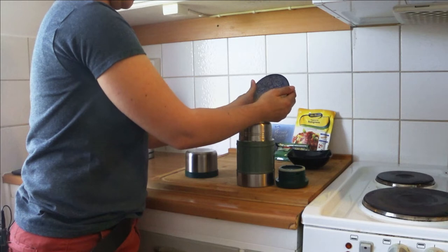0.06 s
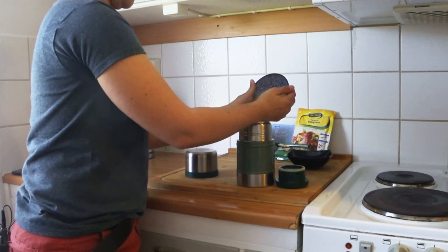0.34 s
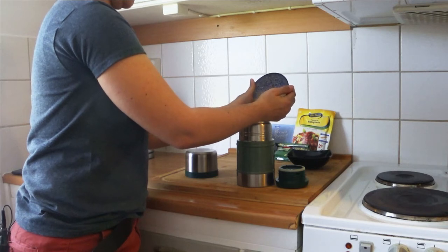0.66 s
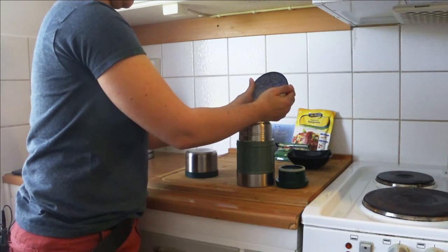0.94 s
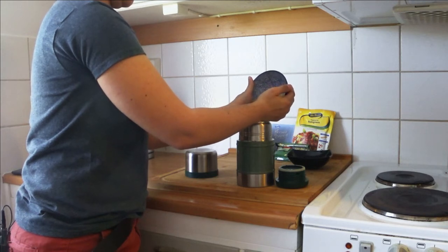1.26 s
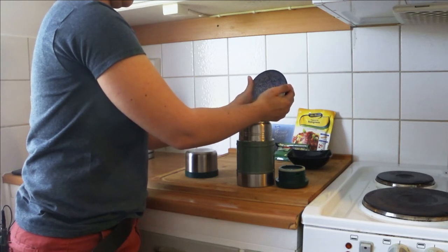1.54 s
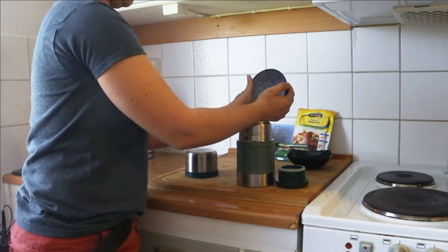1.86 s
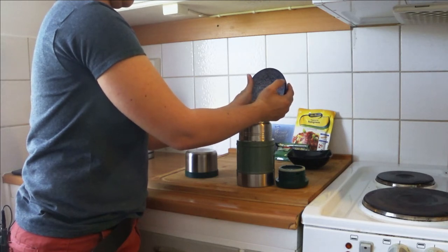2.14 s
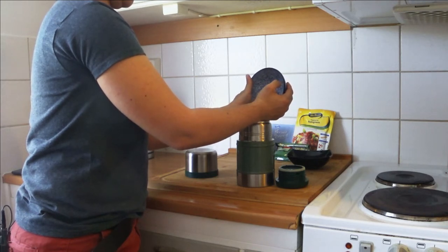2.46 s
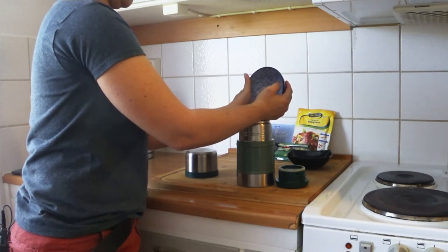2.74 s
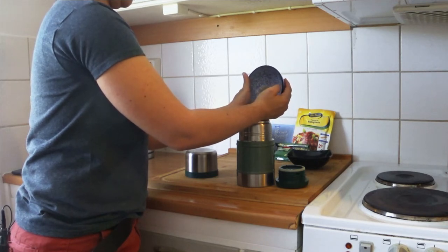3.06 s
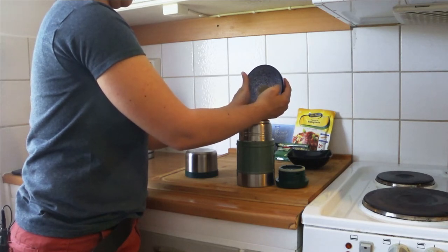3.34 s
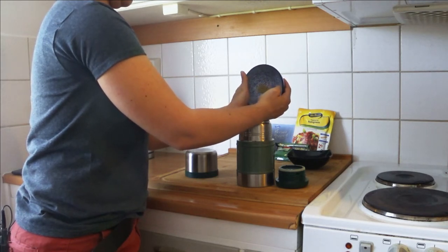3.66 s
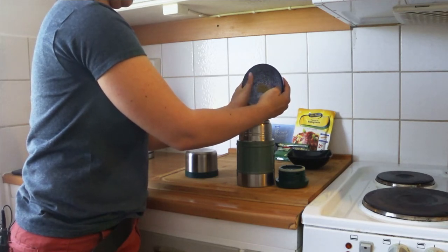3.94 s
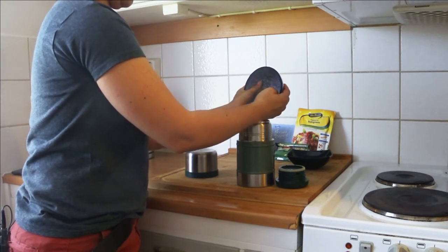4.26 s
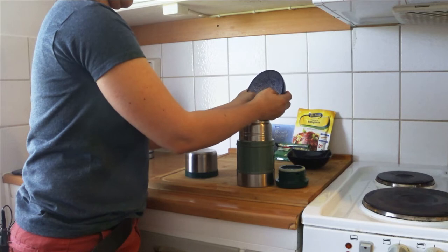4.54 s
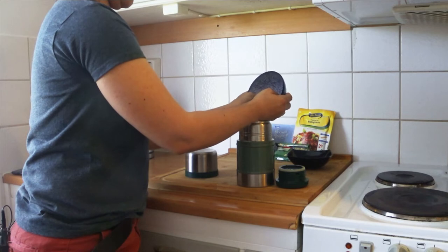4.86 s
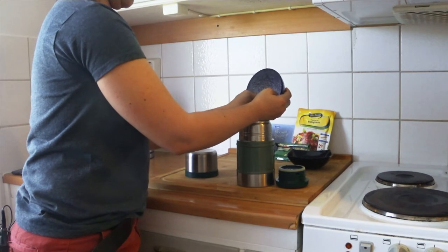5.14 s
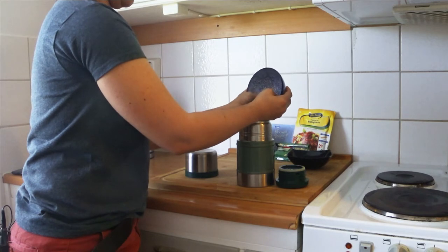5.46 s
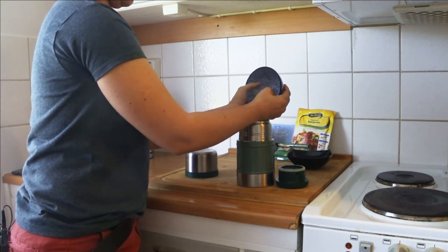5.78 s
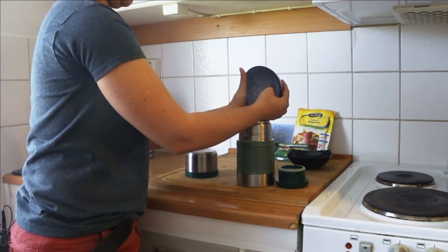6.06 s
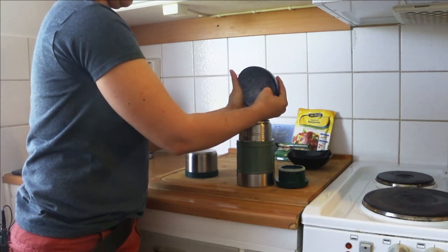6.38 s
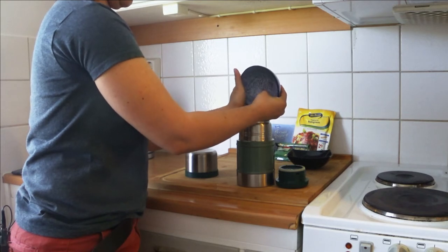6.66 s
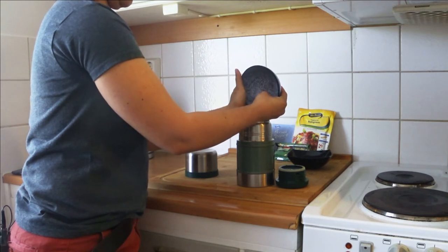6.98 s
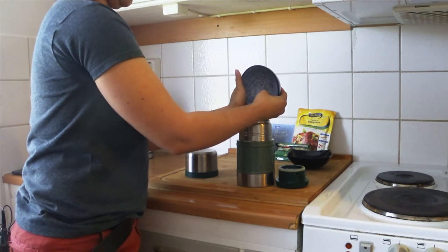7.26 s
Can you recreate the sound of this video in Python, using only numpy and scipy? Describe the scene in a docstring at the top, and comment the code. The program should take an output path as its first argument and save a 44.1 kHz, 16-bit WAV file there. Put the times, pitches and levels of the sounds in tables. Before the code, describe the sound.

Dry macaroni rattles densely into a steel flask, thins out, and ends with faint bowl scrapes and a few single clicks.

```python
"""A kitchen with a wooden counter: dry macaroni is pushed from a bowl into a steel food flask.
The pieces tick on each other, ring the steel wall until the heap damps it, sound the hollow of the
flask and thump the counter. After four seconds the stream runs out; fingers scrape the last pieces
out of the bowl, and they drop one by one. Short reflections and a low room murmur surround it all."""
import sys
import numpy as np
from scipy import signal
from scipy.fft import rfft, irfft
from scipy.io import wavfile

SR = 44100
rng = np.random.default_rng(int(sys.argv[2]) if len(sys.argv) > 2 else 0)


def generate_wav(signal):
    """Clip the signal to [-1, 1] and save it as 16-bit WAV at the path in sys.argv[1]."""
    frames = np.transpose(np.atleast_2d(signal))
    scaled = np.clip(frames, -1, 1) * 32767
    pcm = np.round(scaled).astype(np.int16)
    wavfile.write(sys.argv[1], SR, pcm)


N = 322776
TIME = np.arange(N) / SR
POURING = np.interp(TIME, [4.13, 4.23], [1, 0])  # the stream runs out
SETTLING = np.interp(TIME, [3.92, 4.24], [1, 0])  # the heap comes to rest


def amp(db):
    return 10 ** (np.asarray(db) / 20)


def unit_rms(x):
    return x / np.sqrt(np.mean(x ** 2) + 1e-20)


def value_at(points, hz):
    point_hz, value = np.transpose(points)
    return np.interp(np.log(hz + 1), np.log(point_hz + 1), value)


def curves(rows):
    times, *columns = np.transpose(rows)
    return [np.interp(TIME, times, column) for column in columns]


def add(mix, start_s, sound):
    part = mix[max(round(start_s * SR), 0):][:len(sound)]
    part += sound[:len(part)]


def blows(start_s, level_db):
    """One impulse for each event."""
    out = np.zeros(N)
    for at, gain in zip(start_s, amp(level_db)):
        add(out, at, np.array([gain]))
    return out


def patter(per_s, spread_db):
    """Random impacts of uneven size and sign, rms 1."""
    size = amp(spread_db * np.minimum(rng.exponential(1, N), 3))
    return unit_rms(size * rng.choice([-1, 1], N) * (rng.random(N) < per_s / SR))


def colour(x, eq, size=2048):
    """Causal EQ that keeps the power of white noise, so only the curve's shape counts."""
    log_gain = np.log(amp(value_at(eq, abs(np.fft.fftfreq(size, 1 / SR)))))
    taps = np.fft.ifft(np.exp(np.conj(signal.hilbert(log_gain)))).real[:size // 2]
    return signal.oaconvolve(x, taps / np.linalg.norm(taps))[:N]


def ring(x, hz, t60):
    """A mode: each unit impulse starts a dying sine of height 1."""
    r, w = np.exp(-np.log(1000) / (t60 * SR)), 2 * np.pi * hz / SR
    return signal.lfilter([0, r * np.sin(w)], [1, -2 * r * np.cos(w), r * r], x + 1e-18)


def resonate(x, hz, width_hz):
    """A resonance of gain 1 that follows the curve hz."""
    turn, r = np.exp(2j * np.pi * np.cumsum(hz) / SR), np.exp(-np.pi * width_hz / SR)
    return 2 * (turn * signal.lfilter([1 - r], [1, -r], x * turn.conj() + 1e-18)).real


def chatter(t60, rise_s, size=2600):
    """A hard piece touches down, skids and buzzes to rest within milliseconds."""
    t = TIME[:size]
    attack = 1 - np.exp(-(t + 1 / SR) / rise_s)
    return rng.standard_normal(size) * attack * np.exp(-np.log(1000) * t / t60)


def bursts(start_s, level_db, t60, rise_s):
    """One chatter for each event."""
    out = np.zeros(N)
    for at, gain in zip(start_s, amp(level_db)):
        add(out, at, gain * chatter(t60, rise_s))
    return out


def pieces(impacts, t60, rise_s=.00018, count=16):
    """Every impact belongs to one of many pieces, each with its own chatter of unit energy."""
    which, out = rng.integers(0, count, N), np.zeros(N)
    shapes = [chatter(t60 * k, rise_s * k) for k in np.geomspace(.5, 2, count)]
    shapes = [shape / np.linalg.norm(shape) for shape in shapes]
    for at in np.flatnonzero(impacts):
        add(out, TIME[at], impacts[at] * shapes[which[at]])
    return out


# Tone of the room bed: freq_hz, gain_db
ROOM_EQ = [(15, -36.5), (25, -10), (53, -7.5), (91, -7), (129, -1), (204, -13), (305, -7.5), (340, -13.5),
           (848, -23), (970, -22.5), (1710, -27.5), (15500, -33)]
def room_tone(level_db=-55.5):
    """Steady low murmur of the room with a faint hiss."""
    gain = amp(value_at(ROOM_EQ, np.fft.rfftfreq(N, 1 / SR)))
    return amp(level_db) * unit_rms(irfft(rfft(rng.standard_normal(N)) * gain, N))


def slumps(start_s, level_db, rise_s=.00607, fall_s=.021):
    """Each strike brings down more pieces: a quick swell that dies away."""
    t = TIME[:SR // 2]
    swell = (1 - np.exp(-t / rise_s)) * np.exp(-t / fall_s)
    return abs(signal.oaconvolve(blows(start_s, level_db), swell)[:N])


# Flow of pasta leaving the bowl: time_s, level_db
POUR_FLOW = [(0, -16), (.5, -18), (.74, -23), (.96, -24.5), (1.12, -37), (1.3, -27), (1.75, -29),
             (2.12, -26), (2.5, -28.5), (2.9, -29), (3.18, -26), (3.7, -32), (4.06, -36.5), (4.2, -68)]
def pour_level(clump_db=1.7, clumps_per_s=30, slump_db=-21):
    """The stream leaves the bowl in uneven clumps and surges after each hard strike."""
    hit_s, hit_db, _ = np.transpose(HARD_HITS)
    clump_s = np.arange(0, TIME[-1] + 1, 1 / clumps_per_s)
    clumps_db = clump_db * np.interp(TIME, clump_s, rng.standard_normal(len(clump_s)))
    stream = amp(curves(POUR_FLOW)[0] + clumps_db)
    return POURING * np.hypot(stream, amp(slump_db) * slumps(hit_s, hit_db))


# Accents, the hardest strikes in the pour: start_s, level_db, counter_knock_db
HARD_HITS = [(.002, 0.5, -30), (.015, -7, -14.5), (0.077, -6, -20.5), (.101, -5.5, -16.5), (.114, -3, -16),
             (.139, -14, -19), (.174, -9, -38), (0.234, -2.5, -34), (.276, -3, -19.5), (.32, -4, -27),
             (.398, -4, -22), (.458, -5, -21.5), (.547, -9.5, -17), (0.593, -14, -40), (.63, -4, -24),
             (.671, -5, -28.5), (.684, -5.5, -38), (0.762, -11, -28), (.777, -5, -21.5), (1.071, -6, -22.5),
             (1.078, -11.5, -45), (1.172, -14, -46), (1.235, -6.5, -45), (1.401, -11.5, -44),
             (1.461, -11.5, -45), (1.546, -8, -41), (1.615, -15.5, -47), (1.811, -15, -47),
             (1.875, -8, -26), (2.141, -13, -46), (2.326, -12, -44), (2.418, -13, -44), (2.593, -10.5, -46),
             (2.73, -13, -44), (3.145, -14, -41), (3.223, -9.5, -33), (3.373, -13, -26),
             (3.647, -17.5, -45), (3.898, -10.5, -46)]
# Tone of pasta on steel: freq_hz, gain_db
ON_STEEL_EQ = [(300, -38.5), (2500, -14), (4500, -22.5), (5400, -19.5), (6300, -23), (8200, -10.5),
               (10300, -7.5), (11200, -1.5), (14000, -7), (16000, 0)]
# Tone of pasta on pasta: freq_hz, gain_db
ON_PASTA_EQ = [(300, -16.5), (1500, -18), (3500, -25.5), (5500, -16.5), (6500, -17.5), (9000, -12),
               (11000, -6.5), (13000, -1), (15300, 2)]
def pasta_ticks(pour, last_ticks):
    """Pieces tick on the bare steel floor, then on each other as the heap covers it."""
    hit_s, hit_db, _ = np.transpose(HARD_HITS)
    density = np.interp(TIME, [3.45, 3.9], [1, .3])  # the stream breaks up into separate pieces
    stream = pour * patter(per_s=480 * density, spread_db=6) * np.sqrt(density.mean() / density)
    accents = amp(-4) * bursts(hit_s, hit_db, t60=.039, rise_s=.00075)
    ticks = accents + pieces(stream, t60=.036, rise_s=.00032) + last_ticks
    bare = np.interp(TIME, [.7, 2], [1, 0])
    on_steel = amp(-1.5) * colour(ticks * np.sqrt(bare), ON_STEEL_EQ)
    return on_steel + colour(ticks * np.sqrt(1 - bare), ON_PASTA_EQ)


# Steel modes, each speaking while the heap lies near its belly:
# pitch_hz, level_db, t60_s, strongest_at_s, span_s
STEEL_MODES = [(5400, -31, .016, 1.9, 1.4), (5593, -24, .012, 1.96, 0.76), (6830, -42.5, 0.0479, .2, .2),
               (7250, -28.5, 0.034, 1.5, .9), (8100, -28, 0.11, .1, 0.76), (8250, -13, .014, 0.98, 0.13),
               (9060, -25.5, .025, 0.68, 1.4), (9550, -19, 0.061, 0.78, 0.36),
               (10400, -28.5, 0.066, .1, .5), (10930, -21.5, 0.02, 0.44, 1.7),
               (11770, -23.5, .03, 0.35, .5), (12340, -21.5, 0.038, 0.94, 1), (13250, -24.5, .02, 1.6, 1.2),
               (14100, -16, 0.021, .8, 1.3), (14550, -25, .03, 1.8, 2.2)]
def steel_wall(pour, pair_split=.005):
    """Each blow lands on another spot and rings its own blend of modes, which come in close pairs."""
    hit_s, hit_db, _ = np.transpose(HARD_HITS)
    grazes = pour * patter(per_s=90, spread_db=2.5)  # only some pieces meet the wall
    impacts = amp(7) * blows(hit_s, hit_db) + amp(-8) * grazes
    at, out = np.flatnonzero(impacts), np.zeros(N)
    for hz, db, t60, strongest_s, span_s in STEEL_MODES:
        angle = 2 * np.pi * rng.random(len(at))
        force = amp(db) * impacts[at] * np.exp(-.5 * ((TIME[at] - strongest_s) / span_s) ** 2)
        for spot, side in ((np.cos(angle), -1), (np.sin(angle), 1)):
            push = np.zeros(N)
            push[at] = force * spot
            out += ring(push, hz * (1 + side * pair_split / 2), t60)
    return out


# Tone of the heap's crunch and of the cracks: freq_hz, gain_db
HEAP_EQ = [(150, -17), (800, -20.5), (1300, -7), (2200, -7.5), (3500, -13.5), (5500, -6.5), (12000, -26)]
def cracks():
    """The hard edge of each strike, stronger where it also knocks the counter."""
    hit_s, hit_db, hit_knock_db = np.transpose(HARD_HITS)
    last_s, _, _, last_knock_db = np.transpose(LAST_DROPS)
    start_s = np.r_[hit_s, hit_s, last_s]
    level_db = np.r_[hit_db - 24, hit_knock_db - 9, last_knock_db - 5]
    return colour(bursts(start_s, level_db, t60=.0047, rise_s=.0002), HEAP_EQ)


# Body of the wooden counter: pitch_hz, level_db, t60_s
COUNTER_MODES = [(49, -13, .075), (123.5, -10, 0.028), (690, 6.5, 0.002), (1930, -1.5, .0012)]
def counter():
    """The flask passes landings to the wood: hard knocks from its bare floor, thumps through the heap."""
    hit_s, _, hit_knock_db = np.transpose(HARD_HITS)
    last_s, last_db, _, last_knock_db = np.transpose(LAST_DROPS)
    on_floor = amp(-51) * patter(per_s=110, spread_db=4) * np.interp(TIME, [.28, .5], [1, 0])
    landings = on_floor + amp(2) * (blows(hit_s, hit_knock_db) + blows(last_s, last_knock_db))
    knocks = sum((-1) ** (k + 1) * amp(db) * ring(landings, hz, t60)
                 for k, (hz, db, t60) in enumerate(COUNTER_MODES))
    thump_db = np.interp(TIME, [0, 1.2, 3.3, 4.2], [-67.5, -64, -65.5, -68.5])
    thumps = amp(thump_db) * POURING * patter(per_s=93, spread_db=2)
    thumps += amp(-13) * blows(last_s, last_db)
    return knocks - ring(thumps, hz=46.2, t60=.063) + amp(-2.5) * ring(thumps, hz=95, t60=.02)


def crunch(level, per_s, spread_db):
    """Pieces settle against each other in many tiny impacts."""
    return level * pieces(patter(per_s, spread_db), t60=.004)


# Upper air modes of the flask: pitch_hz, width_hz, level_db, change_when_empty_db
AIR_MODES = [(906, 12, -.5, -15), (1138, 37, -4, -5), (1237, 68.4, -8, -12.5), (1618, 82, -1.5, 12),
             (1774, 49, 4.5, 15.5), (1926, 110, -3.5, 9.5), (2215, 94, -5, 9), (2386, 120, -9, 14),
             (2620, 150, -8.5, -9.5), (3238, 100, -10, -3.5), (3953, 54, -7, -7)]
# The growing heap retunes the air: time_s, lowest_mode_hz, upper_pitch_ratio
AIR_TUNING = [(0, 478.5, 0.99), (1.6, 489, 0.98), (2.8, 497, .99), (3.6, 510, 0.94), (4.2, 495, 0.89)]
# Tone of a lone piece tumbling on the heap: freq_hz, gain_db
TUMBLE_EQ = [(150, -9.5), (360, 3), (700, -1.5), (1100, -3), (1650, 5), (2000, -4), (2900, -15.5),
             (8000, -19)]
def flask_hollow(tumbles, fade_db_per_s=3.5, low_fade_db_per_s=1.6):
    """Crunch and tumbles leave through the flask's air: returns the hollow rattle and its low note."""
    low_hz, retune = curves(AIR_TUNING)
    hit_s, _, _ = np.transpose(HARD_HITS)
    swell = slumps(hit_s, np.zeros(len(hit_s)))
    empty = np.interp(TIME, [.22, 1.06], [1, 0])
    level = SETTLING * amp(-37 - fade_db_per_s * TIME - 7.5 * empty) * (1 + .55 * swell)
    drive = crunch(level, per_s=1400, spread_db=4.5) + amp(-4.5) * tumbles
    # neighbouring modes of a pipe radiate with opposite signs
    upper = sum((-1) ** k * resonate(drive * amp(db + empty * empty_db), hz * retune, width_hz)
                for k, (hz, width_hz, db, empty_db) in enumerate(AIR_MODES))
    upper = signal.sosfilt(signal.butter(2, 850, "high", fs=SR, output="sos"), upper)
    wake_db = np.interp(TIME, [.4, 1.32], [-12, 0])  # the low note wakes once pieces land on a heap
    low_level = SETTLING * amp(-45 - low_fade_db_per_s * TIME + wake_db) * (1 + .86 * swell)
    low_drive = crunch(low_level, per_s=1400, spread_db=3) + amp(8) * tumbles
    low_note = resonate(resonate(low_drive, low_hz, width_hz=30), low_hz, width_hz=85)
    broadband = amp(-5.5) * colour(crunch(level, per_s=450, spread_db=3), HEAP_EQ)
    broadband += amp(5.5) * colour(tumbles, TUMBLE_EQ)
    return amp(15) * upper + broadband, amp(23.5) * low_note


# Clinks on the steel lip: start_s, pitch_hz, level_db, t60_s
LIP_CLINKS = [(1.4, 6070, -20.5, 0.064), (1.4012, 9500, -24, 0.033), (6.8674, 3830, -49, 0.09)]
def lip_clinks():
    """A piece catches the lip of the flask and rings a clear note."""
    return sum(ring(blows([start_s], [db]), hz, t60) for start_s, hz, db, t60 in LIP_CLINKS)


# The stragglers: start_s, tick_db, tumble_db, counter_knock_db
LAST_DROPS = [(4.0897, -16, -52, -35), (4.11, -22, -49.5, -56), (4.1884, -27, -66, -60),
              (4.667, -29, -66, -33.5), (4.711, -23.5, -67, -58), (4.7304, -31, -70, -58),
              (4.775, -30, -77, -65), (4.787, -28.5, -78, -65), (4.926, -28.5, -68, -60),
              (4.936, -27, -44.5, -52), (4.9746, -29, -49, -47), (4.9895, -30, -47, -34),
              (6.2124, -26.5, -44.5, -36), (6.2305, -36, -55, -60), (6.2562, -24.5, -50, -52),
              (6.3006, -27.5, -48, -50), (6.3586, -36.5, -57, -65), (6.6067, -27.5, -64.5, -31.5),
              (6.8538, -26.5, -51.5, -39.5)]
def last_pieces():
    """Lone pieces land on the heap: returns their sharp ticks and their longer tumbles."""
    start_s, tick_db, tumble_db, _ = np.transpose(LAST_DROPS)
    ticks = amp(2) * bursts(start_s, tick_db, t60=.017, rise_s=.00063)
    return ticks, bursts(start_s, tumble_db, t60=.053, rise_s=.00072)


def finger_push(start_s, length_s, attack_s=.0081, release_s=.034):
    """A push of the fingers sets in quickly, holds and dies away."""
    attack = np.clip((TIME - start_s) / attack_s, 0, 1)
    return attack * np.exp(-np.maximum(TIME - start_s - length_s, 0) / release_s)


# Fingers push pieces along the bowl: start_s, length_s, scrape_db, ticking_db
FINGER_PUSHES = [(4.576, 0.029, -69, -48), (4.66, 0.079, -62.5, -45), (4.756, 0.035, -54, -57),
                 (5.0, 0.11, -92, -60), (6.039, 0.09, -65, -68), (6.25, .36, -72.5, -60)]
# Pieces nudged against the bowl: start_s, level_db
BOWL_TAPS = [(4.679, -46.5), (4.726, -43), (4.749, -45), (4.7991, -39.5), (5.9145, -41), (6.8674, -41)]
# Ring of the bowl: pitch_hz, level_db, t60_s
BOWL_MODES = [(1640, -8, 0.034), (3223, -7, .017), (3720, -8.5, .015), (5140, -8, 0.032),
              (7340, -13.5, 0.011)]
# Tone of pasta rubbing along the bowl: freq_hz, gain_db
RUB_EQ = [(500, -22), (1200, -14.5), (2300, -9), (3200, 4.5), (4300, 0), (5150, 3), (6200, -1), (7500, 2),
          (10000, -5), (15000, -21)]
def bowl_scrape():
    """The last pieces rub and tap along the bowl, ring it and tick lightly on each other."""
    scrape_level, tick_level = sum(amp(levels_db)[:, None] * finger_push(start_s, length_s)
                                   for start_s, length_s, *levels_db in FINGER_PUSHES)
    rub = scrape_level * patter(per_s=900, spread_db=4.5)
    taps = amp(15.5) * blows(*np.transpose(BOWL_TAPS))
    contact = pieces(rub + taps, t60=.017)
    ticking = pieces(tick_level * patter(per_s=330, spread_db=9.5), t60=.008)
    ringing = sum(amp(db) * ring(contact, hz, t60) for hz, db, t60 in BOWL_MODES)
    return amp(-16) * ringing + colour(contact, RUB_EQ) + colour(ticking, ON_PASTA_EQ)


# Reverb time of the kitchen: freq_hz, t60_s
KITCHEN_DECAY = [(100, 0.3), (1000, 0.37), (5000, 0.29), (15000, 0.27)]
def kitchen_reverb(send, size=24000):
    """Reflections off tiles and counter; the treble dies first."""
    taps = rng.standard_normal(size) * (rng.random(size) < .15) * (TIME[:size] > .004)
    hz, t, spectrum = signal.stft(taps, SR, nperseg=256)
    decay = np.exp(-np.log(1000) * t / value_at(KITCHEN_DECAY, hz)[:, None])
    tail = signal.istft(spectrum * decay, SR, nperseg=256)[1]
    return signal.oaconvolve(send, tail / np.linalg.norm(tail))[:N]


def scene():
    """Mono mix of flask, counter and bowl in the kitchen; the lows stay nearly dry."""
    pour = pour_level()
    last_ticks, tumbles = last_pieces()
    hollow, low_note = flask_hollow(tumbles)
    rattle = pasta_ticks(pour, last_ticks) + steel_wall(pour) + cracks() + hollow + lip_clinks()
    lows = counter() + low_note
    scrape = bowl_scrape()
    reverb = kitchen_reverb(amp(-5) * rattle + amp(-5.5) * scrape + amp(-27) * lows)
    return (rattle + scrape + lows + reverb + room_tone())[None]


def record(dry, cutoff_hz=15850):
    """A steep low-pass takes off the very top."""
    lowpass = signal.firwin(401, cutoff_hz, window=("kaiser", 8), fs=SR)
    return signal.oaconvolve(dry, lowpass[None], "same")


dry = scene()
out = record(dry)
generate_wav(out)
```